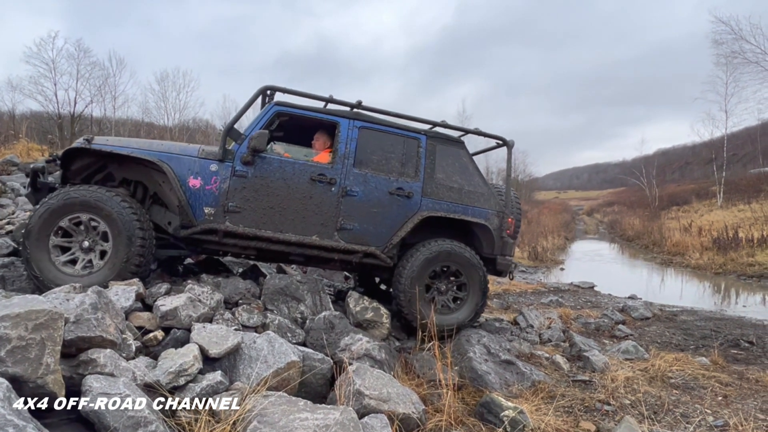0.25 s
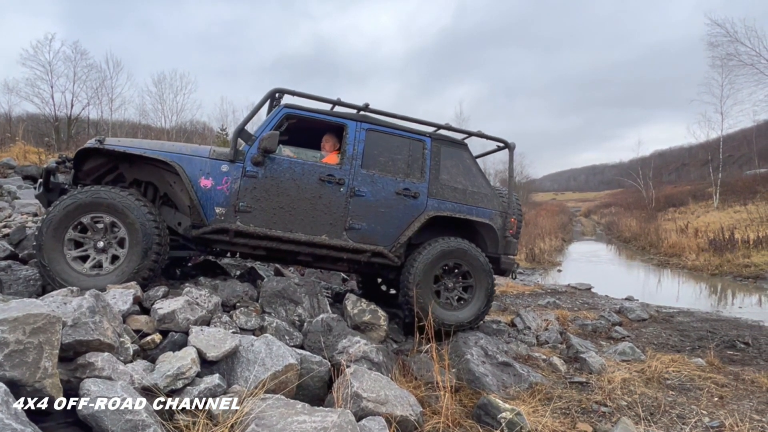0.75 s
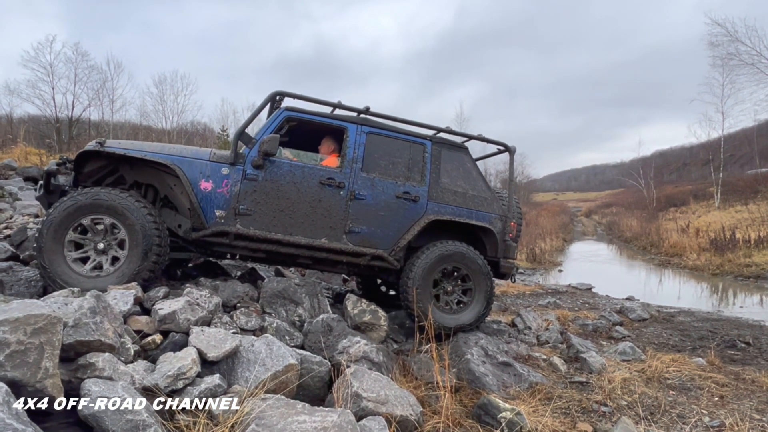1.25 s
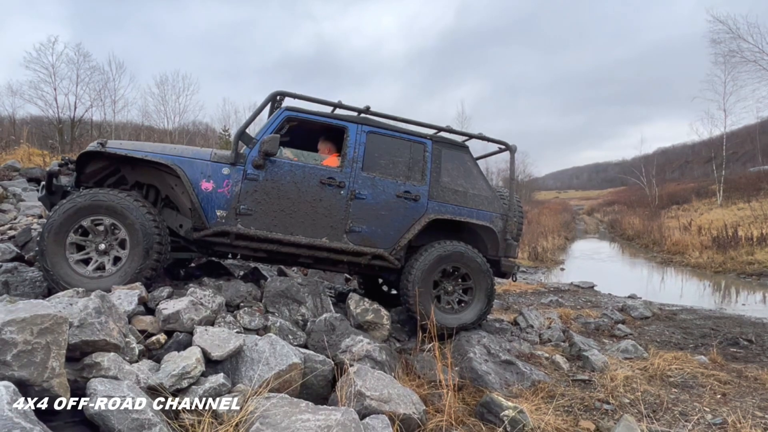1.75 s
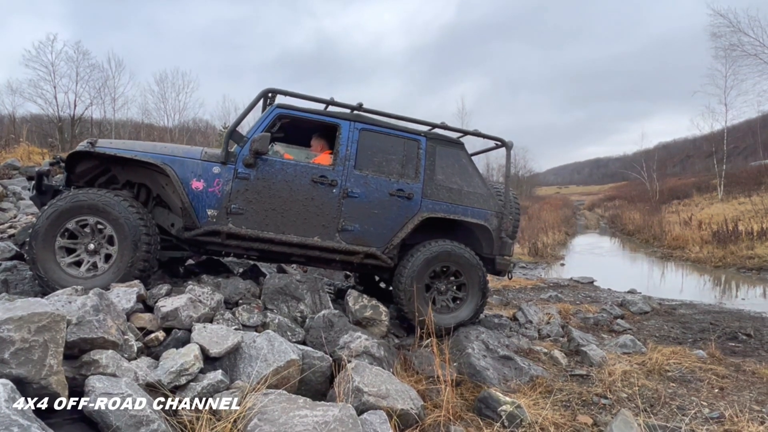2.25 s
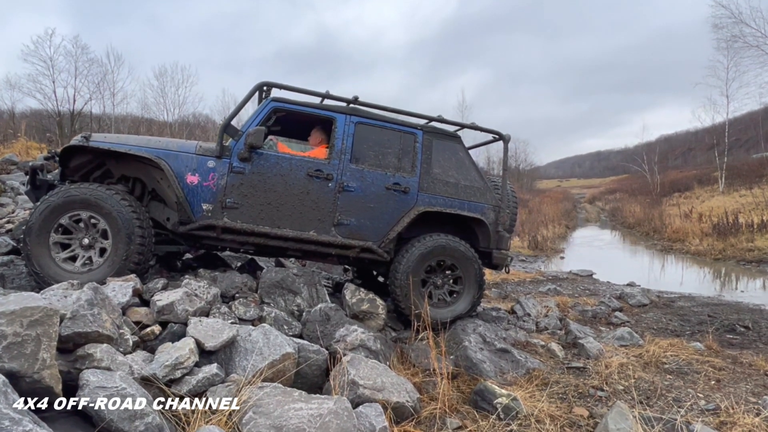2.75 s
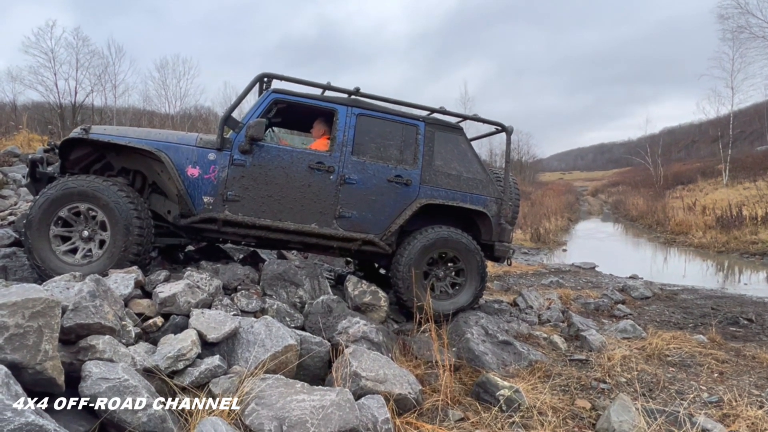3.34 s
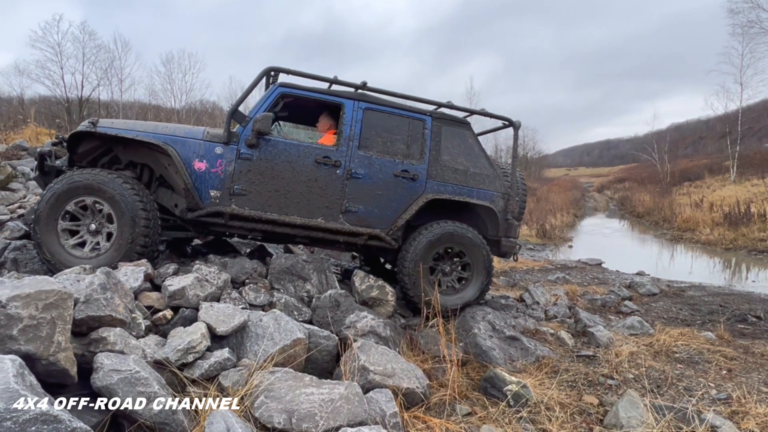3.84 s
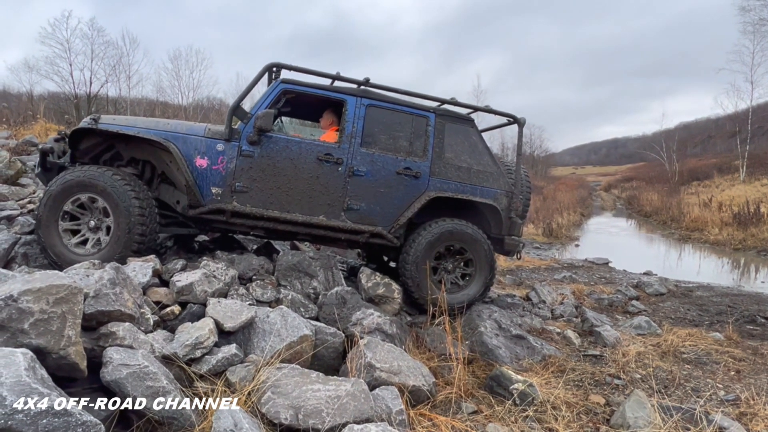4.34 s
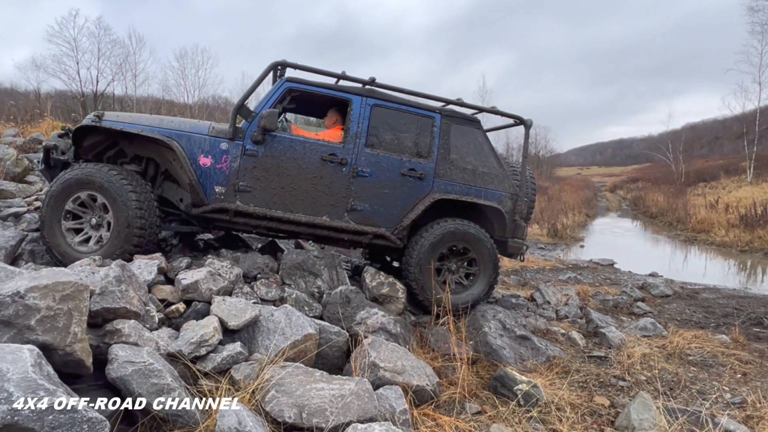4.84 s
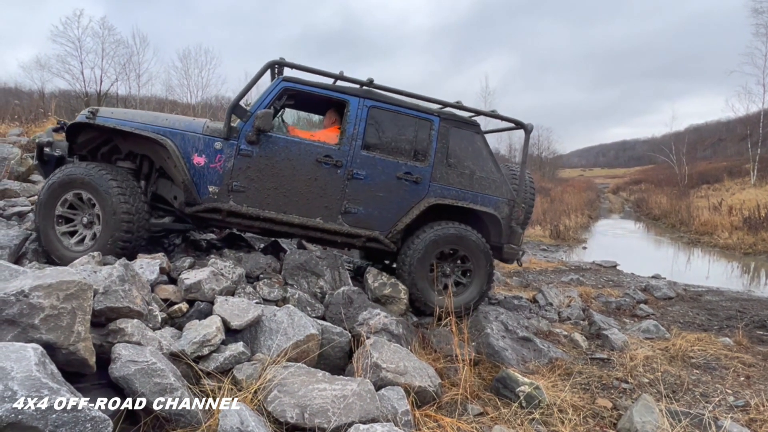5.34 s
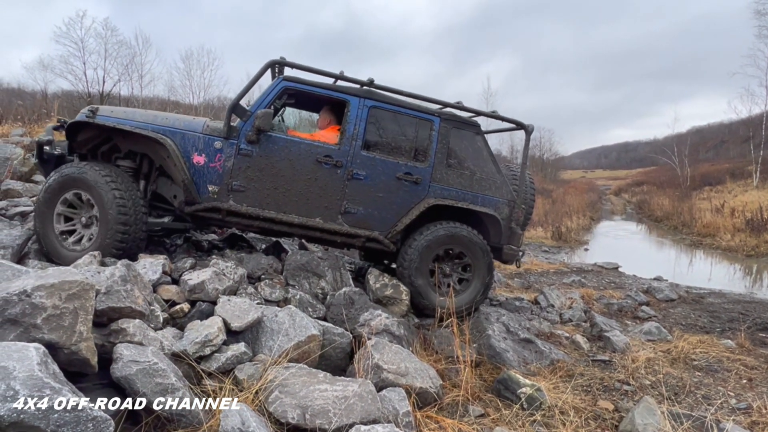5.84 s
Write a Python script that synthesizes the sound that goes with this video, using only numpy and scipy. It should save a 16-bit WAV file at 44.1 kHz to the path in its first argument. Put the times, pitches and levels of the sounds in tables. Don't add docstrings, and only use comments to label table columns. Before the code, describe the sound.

A low-revving six-cylinder engine chugs quietly as an off-road vehicle creeps over boulders in the open. Gritty tread scrapes and faint stone taps come first, then a loud solid knock with a low thud and a lighter double clack. After a calmer stretch of idling throb and fan hiss, the revs rise strongly, the exhaust swells, metal ticks and rattles emerge, and rocks crunch and slip under the tyres. Nearby stereo pickup with little echo.

```python
import sys
import numpy as np
from scipy import signal
from scipy.fft import rfft, irfft, next_fast_len
from scipy.io import wavfile
from scipy.ndimage import uniform_filter1d

SR = 44100
rng = np.random.default_rng(int(sys.argv[2]) if len(sys.argv) > 2 else 0)


def store_pcm(level_fs):
    pcm = np.round(np.clip(level_fs, -1, 1) * 32767).astype(np.int16)
    wavfile.write(sys.argv[1], SR, np.atleast_2d(pcm).T)


def decibels_to_gain(level_db):
    exponent = np.asarray(level_db, float) / 20
    return 10 ** exponent


N = 268569

# time in seconds, firing rate of one bank in Hz.
BANK_SPEED = [(0.0, 16.17), (0.15, 16.57), (0.7, 19.09), (1.15, 19.8), (1.35, 18.96), (1.55, 18.67),
              (1.9, 17.2), (2.28, 19.06), (2.66, 19.59), (3.04, 19.21), (3.38, 17.37), (3.55, 18.71),
              (4.44, 29.57), (4.78, 32.47), (5.21, 39.46), (5.41, 39.64), (5.7, 38.44), (6.09, 43.2)]
# time in seconds, exhaust level in dB.
ENGINE_LOAD = [(0.0, -39), (0.3, -32), (0.7, -28), (1.1, -28), (1.73, -30.5), (1.85, -41), (2.17, -31.5),
               (2.31, -28), (2.63, -31), (3.02, -30.5), (3.34, -35.5), (3.44, -31), (3.88, -24.5),
               (4.22, -23), (4.44, -19.5), (4.9, -14.5), (5.4, -16), (6.09, -15)]
# frequency in Hz, gain in dB.
TAIL_PIPE = [(25, -45), (42, -14), (62, 0), (80, 0), (94, -6), (118, -1), (138, 1), (156, -4), (188, -21),
             (212, -22), (237, -8), (258, -24), (292, -38), (1000, -70)]
# frequency in Hz, gain in dB.
CROSSOVER_PIPE = [(24, -45), (42, -25), (50, -6), (58, 0), (70, 2), (97, -12), (118, -5), (137, -9),
                  (160, -15), (205, -23), (242, -14), (270, -34), (350, -27), (420, -46), (1000, -70)]
# frequency in Hz, density in dB per Hz.
BLOCK_COLOUR = [(30, 1), (60, 16), (150, 14.5), (250, 4.5), (380, -5), (550, -0.5), (750, 1), (900, -5.5),
                (1050, -22.5), (1300, -5.5), (1600, -16.5), (2000, -22), (2600, -17.5), (4000, -58)]
# frequency in Hz, density in dB per Hz.
VALVE_COLOUR = [(1290, -22), (2200, 1), (2680, -7.0), (2900, 4.0), (3240, 0.5), (3590, 2), (4740, 1),
                (5320, -2.0), (6250, -13), (7390, -16.0), (10300, -16.5), (11400, -15), (12600, -27),
                (16400, -46), (22000, -120)][:-2] + [(14800, -13), (16000, -25)]
# start in seconds, peak in dB, ring in Hz.
RATTLES = [
    (0.655, -35, 3400),
    (0.68, -41, 3700),
    (1.1104, -39, 6400),
    (1.3493, -36.5, 5240),
    (2.1495, -36.5, 6620),
    (2.2394, -37.5, 5310),
    (4.2874, -30.5, 6360),
    (5.0165, -21, 6180),
    (5.387, -16, 5130),
    (5.4907, -24.5, 6820),
]
# middle in seconds, length in seconds, level in dB.
BELT_SLIPS = [
    (0, 0.6, -61),
    (.9, 0.12, -62),
    (3.44, 0.52, -60),
]
# frequency in Hz, density in dB per Hz.
GRIT_COLOUR = [(160, -38.5), (280, 5.5), (403, 0), (679, 0), (1100, -9.5), (1180, -5), (1720, -9),
               (1960, -7.5), (2400, -31.5), (2780, -7.5), (3070, -32), (6350, -25), (9000, -28.5),
               (11700, -62), (19800, -120)]
# start in seconds, hold in seconds, grit in dB, dust in dB.
TREAD_SCRUBS = [(0.01, 0.044, -34.5, -54), (0.06, 0.31, -46, -61), (0.147, 0.097, -42.5, -62),
                (0.475, 0.12, -44, -61), (0.627, 0.06, -43.5, -64), (0.846, 0.17, -45.5, -56),
                (1.116, 0.032, -40.5, -60), (1.328, 0.033, -45.5, -73), (1.425, 0.043, -46, -61),
                (1.567, 0.028, -45, -63), (1.76, 0.31, -52, -61), (2.123, 0.16, -51, -69),
                (3.25, .35, -52, -67), (4.47, 0.0061, -28, -48), (5.186, 0.07, -37, -49),
                (5.265, 0.067, -30.5, -46), (5.318, 0.044, -25.5, -44), (5.381, 0.051, -27, -43),
                (5.46, 0.034, -34, -48), (5.658, 0.023, -34, -44), (5.806, 0.077, -30.5, -46)]
# start in seconds, end in seconds, pitch in Hz, level in dB.
RUBBER_CREAK = (.29, .385, 452, -46)
# start in seconds, peak in dB, ring in Hz, left minus right in dB.
STONE_KNOCKS = [(0.059, -22, 526, 6), (0.157, -24, 490, 10), (1.126, -5.5, 736, 2.5),
                (1.139, -15.5, 865, -12), (1.159, -14.5, 610, 7), (1.232, -26.5, 585, 10),
                (1.466, -14.5, 619, 1), (1.472, -20, 308, 1), (1.479, -20.5, 720, 2), (5.878, -17, 313, 8),
                (5.265, -25, 447, 12), (5.418, -17, 1930, -9), (5.544, -14, 763, 4), (5.615, -22, 740, 8),
                (5.869, -16, 766, 1), (5.832, -8, 800, 0)]
# start in seconds, peak in dB, ring in Hz, left minus right in dB.
STONE_CRUNCHES = [(0.018, -31, 700, 5), (0.233, -26.5, 370, 7), (0.589, -35, 560, 19), (0.906, -38, 651, 6),
                  (0.956, -29.5, 596, 12), (1.097, -25.5, 596, 0), (1.179, -20.5, 456, 3),
                  (1.499, -26.5, 590, 6), (2.78, -40, 810, 4.5), (4.474, -15.5, 744, -2),
                  (5.204, -25, 517, 12), (5.319, -16, 1284, -11), (5.387, -22, 842, -5),
                  (5.495, -18, 1537, 8.5), (1.135, -23, 1293, 1), (5.74, -16.5, 504, 3),
                  (5.808, -30, 560, 7), (5.867, -15.5, 420, 11), (5.899, -20.5, 360, 10)]
# start in seconds, peak in dB, ring in Hz, left minus right in dB.
ROCK_SLIPS = [(0.0228, -37, 1950, -11), (1.15, -36, 1235, 4), (1.468, -53, 1310, 14),
              (5.2036, -27.5, 2050, -5), (5.2646, -27, 1306, 0), (5.3186, -19.5, 1310, 1),
              (5.3394, -20, 1170, 1), (5.3852, -27, 1290, 13), (5.262, -31, 1970, -7),
              (5.32, -26, 2000, -9), (5.332, -19, 700, 0), (5.392, -21, 1530, 11), (5.3994, -24, 1943, -5),
              (5.4394, -27, 1890, -7)]
# decay in seconds, chips in dB.
KNOCK_KIND = (.023, -15)
CRUNCH_KIND = (0.027, -1.8)
SLIP_KIND = (0.053, -6)
# start in seconds, peak in dB, pitch in Hz, decay in seconds.
BOULDER_THUMPS = [
    (1.158, -6, 79.4, 0.053),
    (1.485, -22, 75, .08),
]
# frequency in Hz, share in dB.
PORT_WIDTH = [(100, -24.5), (300, -0.5), (800, 0.5), (2000, 5.5), (4000, 2.5), (8000, 10), (11000, 3.5),
              (16000, 3)]
# frequency in Hz, lead in samples.
PORT_LEAD = [(60, 11), (125, 9), (300, 12), (900, 7), (1200, 7), (1700, 22), (16000, 22)]
# frequency in Hz, gain in dB.
PORT_COLOUR = [(12900, 0), (13400, -8), (13700, -32), (14050, -32), (14350, -3), (15750, -3), (16000, -70)]

CRAWL_HZ = 18
BLOCK_DB, BLOCK_DB_PER_HZ = -46.5, 0.4544
VALVE_DB, VALVE_DB_PER_HZ = -59, 0.6957
BELT_DB, BELT_DB_PER_HZ = -67.5, 0.6581
ROLL_DB, ROLL_DB_PER_HZ = -54, 0.5823
DUST_DB, DUST_DB_PER_HZ = -74.5, 1.31
TICK_DB, TICK_DB_PER_HZ = -36, 0.55
TICK_HZ, TICK_SPREAD_DB = 6160, 1.8
TICK_PHASE = 0.31
TICK_FROM_HZ, TICK_MUTE_DB_PER_HZ = 21, 4
SCRUB_ATTACK_S, SCRUB_RELEASE_S = 0.005, 0.022
SHAKE_DB, RASP_DB = -2, -16
FIRST_FIRING = 0.4
DRONE_HZ, DRONE_WIDTH_HZ, DRONE_DB = 231.83, 15.5, -9
THUD_BELOW_HZ = 690
LEFT_DB = 1.4


def unit(x):
    return x / np.sqrt(np.mean(x ** 2))


def columns(table):
    s, *rest = np.transpose(table)
    return [np.interp(np.arange(N) / SR, s, c) for c in rest]


def colour(x, points):
    size = next_fast_len(N + SR)
    hz, db = np.transpose(points)
    axis = np.log(np.maximum(np.fft.rfftfreq(size, 1 / SR), 1))
    log_gain = np.interp(axis, np.log(hz), db) * np.log(10) / 20
    ceps = irfft(log_gain, size)
    ceps[1:size // 2] *= 2
    ceps[size // 2 + 1:] = 0
    return irfft(rfft(x, size) * np.exp(rfft(ceps)), size)[..., :N]


def walk(rate):
    k = int(SR / rate)
    held = np.repeat(rng.standard_normal(N // k + 1), k)
    return unit(uniform_filter1d(uniform_filter1d(held, k), k)[:N])


def add(track, s, x):
    i = int(s * SR)
    x = x[..., :N - i]
    track[..., i:i + x.shape[-1]] += x


def hiss():
    return rng.standard_normal((3, N))


def lag(x):
    size = next_fast_len(N + SR)
    f = np.fft.rfftfreq(size, 1 / SR)
    hz, lead = np.transpose(PORT_LEAD)
    samples = np.interp(np.log(f + 1), np.log(hz), lead)
    return irfft(rfft(x, size) * np.exp(-2j * np.pi * f / SR * samples), size)[:N]


def ports(x):
    return np.array([x * decibels_to_gain(LEFT_DB / 2), lag(x) * decibels_to_gain(-LEFT_DB / 2)])


def spread(x):
    return ports(x[0]) + colour(x[1:], PORT_WIDTH)


def scatter(x, length_s, delay_s):
    t = np.arange(int(4 * length_s * SR)) / SR
    tail = rng.standard_normal((2, len(t))) * np.exp(-t / length_s) * (t > delay_s)
    tail /= np.sqrt(np.sum(tail ** 2, axis=1, keepdims=True))
    smear = signal.fftconvolve(x * np.ones((2, 1)), tail, axes=1)[:, :N]
    return colour(smear, PORT_WIDTH)


def with_speed(db, db_per_hz):
    return db + db_per_hz * (columns(BANK_SPEED)[0] - CRAWL_HZ)


def belt():
    t = np.arange(N) / SR
    gain = decibels_to_gain(with_speed(BELT_DB, BELT_DB_PER_HZ))
    for s, length_s, db in BELT_SLIPS:
        gain = np.hypot(gain, decibels_to_gain(db) * np.exp(-((t - s) / length_s * 2) ** 2))
    band = [(4200, -17), (5600, -14), (6300, -8), (7000, -12.5), (9000, -27.5)]  # (Hz, dB)
    return unit(colour(hiss() * decibels_to_gain(0.84 * walk(20)), band)) * gain


def scrubs():
    t = np.arange(N) / SR
    gains = decibels_to_gain([with_speed(ROLL_DB, ROLL_DB_PER_HZ), with_speed(DUST_DB, DUST_DB_PER_HZ)])
    for s, hold_s, grit_db, dust_db in TREAD_SCRUBS:
        attack = np.minimum((t - s) / SCRUB_ATTACK_S, 0)
        release = np.maximum((t - s - hold_s) / SCRUB_RELEASE_S, 0)
        gains = np.hypot(gains, decibels_to_gain([[grit_db], [dust_db]]) * np.exp(attack - release))
    return gains


def tyres():
    grind_db, dust_db = 20 * np.log10(scrubs())
    slip_db = np.interp(grind_db, [-55, -35], [1.2, 2.6])
    grains = (rng.random(N) < 2500 / SR) * hiss() * decibels_to_gain(1.7 * rng.exponential(size=N))
    grit = unit(colour(grains * decibels_to_gain(slip_db * walk(28)), GRIT_COLOUR)) * decibels_to_gain(grind_db - 4.5)
    dust_band = [(8000, -47), (10400, -9), (11500, 9.5), (12900, -11), (16000, 3.5)]  # (Hz, dB)
    dust = unit(colour(hiss() * decibels_to_gain(1.4 * walk(8.2)), dust_band)) * decibels_to_gain(dust_db - 4)
    start_s, end_s, hz, db = RUBBER_CREAK
    t = np.arange(int((end_s - start_s) * SR)) / SR
    add(grit, start_s, decibels_to_gain(db) * np.sin(2 * np.pi * hz * t) * signal.windows.tukey(len(t), 0.4))
    return grit + dust


def stones():
    out, t = np.zeros((2, N)), np.arange(SR // 5) / SR
    for s, db, hz, t60 in BOULDER_THUMPS:
        add(out, s, -decibels_to_gain(db) * np.sin(2 * np.pi * hz * t) * np.exp(-np.log(1000) * t / t60))
    kinds = (STONE_KNOCKS, KNOCK_KIND), (STONE_CRUNCHES, CRUNCH_KIND), (ROCK_SLIPS, SLIP_KIND)
    for table, (t60, chips_db) in kinds:
        for s, db, hz, pan_db in table:
            fade = np.exp(-np.log(1000) * t / max(t60, 0.005)) * np.minimum(t / 0.0016, 1)
            ring = np.sin(2 * np.pi * hz * t)
            ring += 0.32 * np.sin(2 * np.pi * 1.9 * hz * t) + 0.072 * np.sin(2 * np.pi * 2.7 * hz * t)
            band = signal.butter(3, [260, min(2.02 * hz, 2800)], "band", fs=SR, output="sos")
            chips = unit(signal.sosfilt(band, rng.standard_normal(len(t))))
            chips *= np.exp(-t / 0.012) * np.minimum(t / 0.007, 1)
            thud = 0.5 * (hz < THUD_BELOW_HZ) * np.sin(2 * np.pi * 140 * t) * np.exp(-t / 0.0078)
            hit = ring * fade + decibels_to_gain(chips_db - 7.5) * chips + thud
            add(out, s, decibels_to_gain(db + np.array([[pan_db], [-pan_db]]) / 2) * hit)
    return out


def tappet():
    out, t = np.zeros(N), np.arange(1500) / SR
    bank_hz, = columns(BANK_SPEED)
    cycle = np.cumsum(bank_hz / 3 / SR) - TICK_PHASE
    at = np.flatnonzero(np.diff(np.floor(cycle))) + 1
    chance = rng.standard_normal((len(at), 2))
    tick_db = with_speed(TICK_DB, TICK_DB_PER_HZ)[at] + TICK_SPREAD_DB * chance[:, 0]
    tick_db -= TICK_MUTE_DB_PER_HZ * np.maximum(TICK_FROM_HZ - bank_hz[at], 0)
    tick_hz = TICK_HZ * (1 + 0.047 * chance[:, 1])
    for s, db, hz in list(RATTLES) + list(zip(at / SR, tick_db, tick_hz)):
        burst = rng.standard_normal((2, len(t))) * np.exp(-t / 0.004) * np.minimum(t / 0.0004, 1)
        ring = signal.lfilter(*signal.iirpeak(hz, 7, fs=SR), burst[0])
        crack = signal.lfilter([1, -1], [1], burst[1])
        add(out, s, decibels_to_gain(db - 5.5) * (2.2 * ring + 0.28 * crack))
    return out


def engine_noise(puff):
    scrub = scrubs()[0]
    block_gain = np.hypot(decibels_to_gain(with_speed(BLOCK_DB, BLOCK_DB_PER_HZ)), decibels_to_gain(SHAKE_DB) * scrub)
    valve_gain = np.hypot(decibels_to_gain(with_speed(VALVE_DB, VALVE_DB_PER_HZ)), decibels_to_gain(RASP_DB) * scrub)
    block = colour(hiss() * (4.7 + puff) * decibels_to_gain(0.6 * walk(14)), BLOCK_COLOUR)
    chatter = hiss() * decibels_to_gain(1.65 * rng.exponential(size=N))
    valves = colour(chatter * (0.43 + puff) * decibels_to_gain(0.47 * walk(11)), VALVE_COLOUR)
    return unit(block) * block_gain * decibels_to_gain(4) + unit(valves) * valve_gain * decibels_to_gain(-3.5)


def firings():
    bank_hz, = columns(BANK_SPEED)
    count = np.cumsum(2 * bank_hz / SR) + FIRST_FIRING
    at = np.flatnonzero(np.diff(np.floor(count))) + 1
    chance = rng.standard_normal((len(at), 2))
    cylinder_db = np.array([0, 0.3, -0.4, 0, 0.3, -0.3])[np.arange(len(at)) % 6]
    jitter = (3 * chance[:, 1]).astype(int)
    pulses = np.zeros(N)
    pulses[np.clip(at + jitter, 0, N - 1)] = decibels_to_gain(cylinder_db + chance[:, 0])
    bank = (-1) ** np.cumsum(pulses > 0)
    return pulses, pulses * bank, np.exp(-(count % 1) / 1.05)


def silencer(x, hz, width_hz):
    w, d = 2 * np.pi * hz, 2 * np.pi * width_hz
    return signal.lfilter(*signal.bilinear([1, -d, w * w], [1, d, w * w], SR), x)


def exhaust(pulses, opposed):
    boom = -silencer(colour(pulses, TAIL_PIPE), 170, 90)
    boom -= silencer(colour(opposed, CROSSOVER_PIPE), 85, 90)
    peak = signal.iirpeak(DRONE_HZ, DRONE_HZ / DRONE_WIDTH_HZ, fs=SR)
    drone = signal.lfilter(*peak, signal.lfilter(*peak, pulses + 0.26 * opposed))
    boom += decibels_to_gain(DRONE_DB + 2 * walk(5.9)) * drone
    boom /= np.sqrt(uniform_filter1d(uniform_filter1d(boom ** 2, SR // 8), SR // 8))
    exhaust_db, = columns(ENGINE_LOAD)
    return boom * decibels_to_gain(exhaust_db)


def scene():
    pulses, opposed, puff = firings()
    noises = belt() + tyres() + engine_noise(puff)
    rock = stones()
    rock[1] = lag(rock[1])
    ticks = tappet()
    direct = ports(exhaust(pulses, opposed) + ticks)
    echoes = decibels_to_gain(-3) * scatter(ticks, 0.01, 0.001) + decibels_to_gain(-11) * scatter(rock, 0.02, 0.003)
    return direct + spread(noises) + rock + echoes


def low_pass(x):
    return signal.sosfilt(signal.butter(12, 17100, fs=SR, output="sos"), x)


def record(dry):
    mix = colour(dry, PORT_COLOUR)
    return low_pass(mix)


dry = scene()
out = record(dry)
store_pcm(out)
```